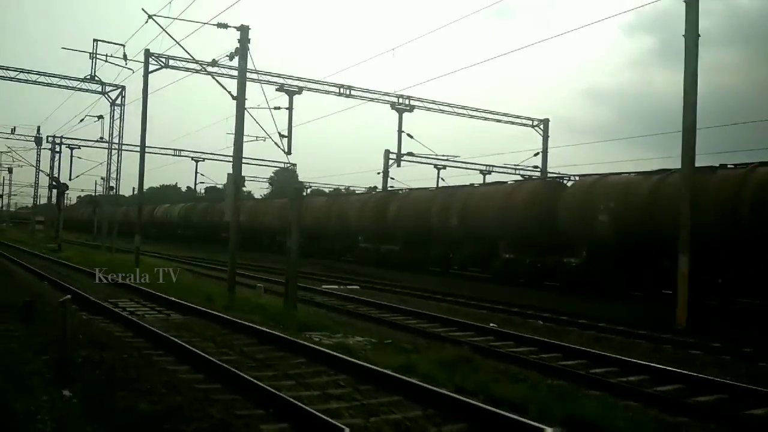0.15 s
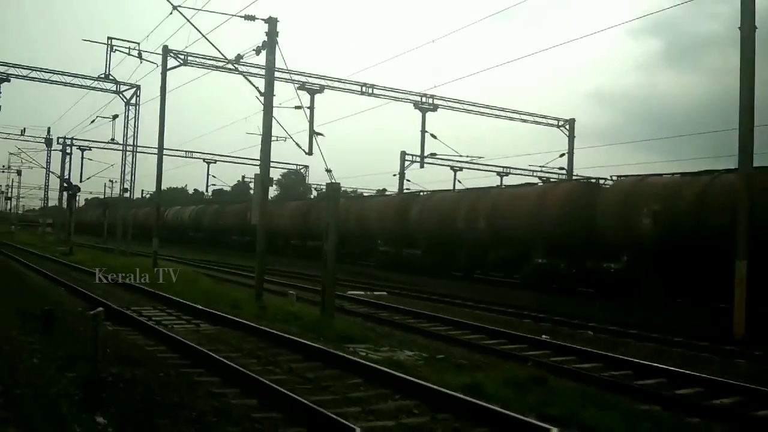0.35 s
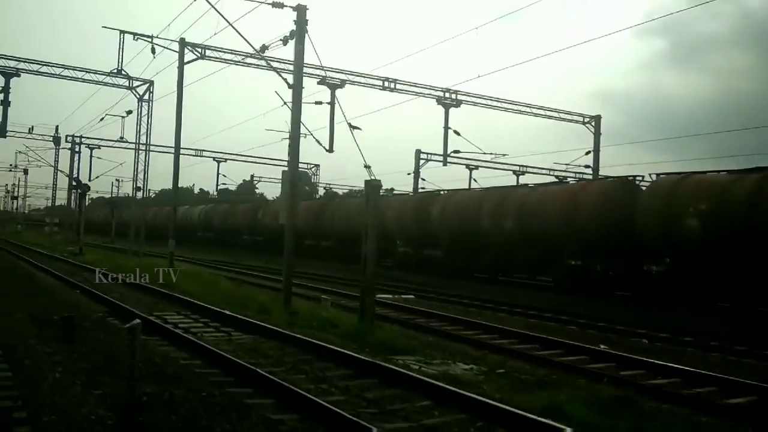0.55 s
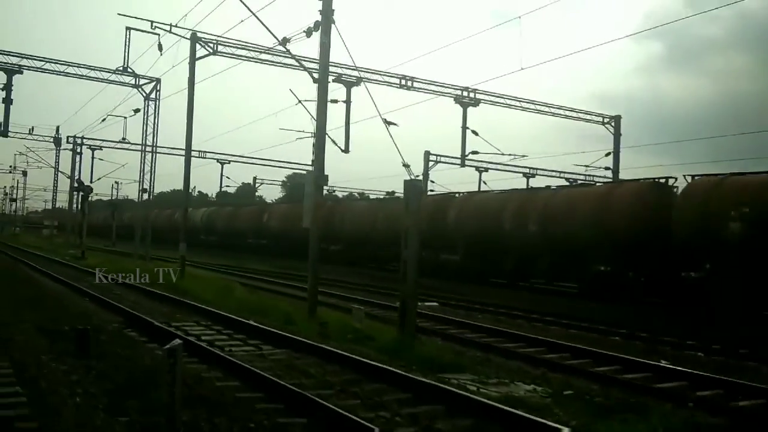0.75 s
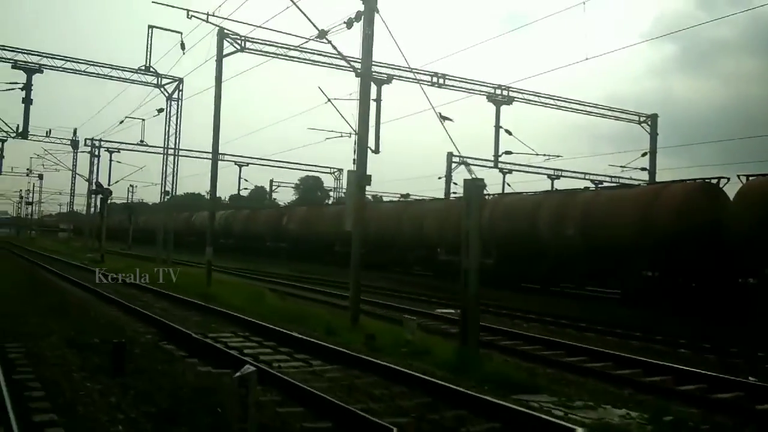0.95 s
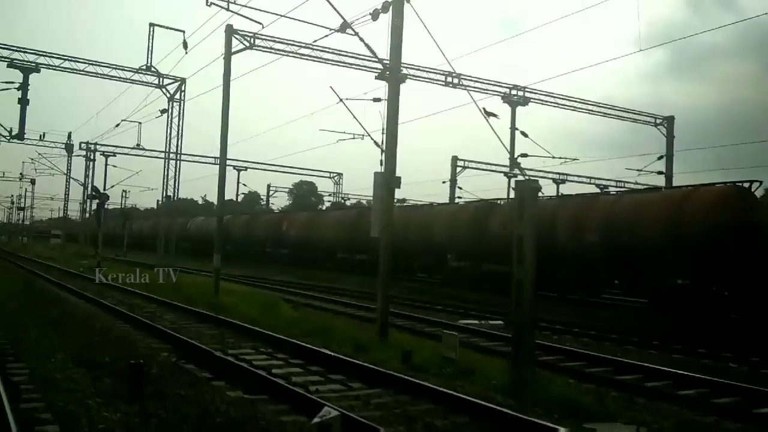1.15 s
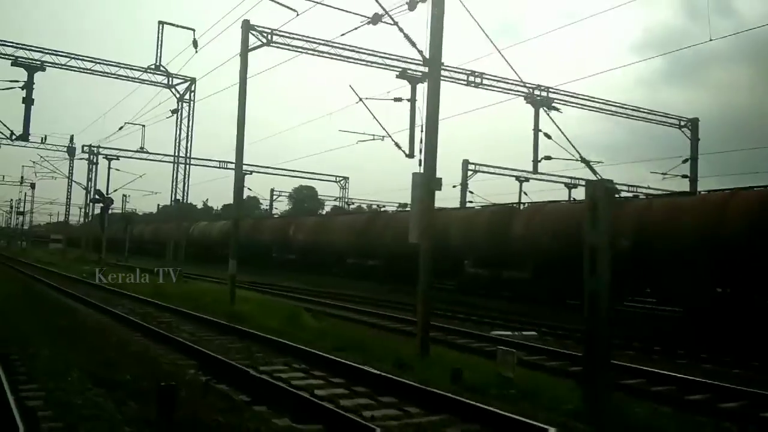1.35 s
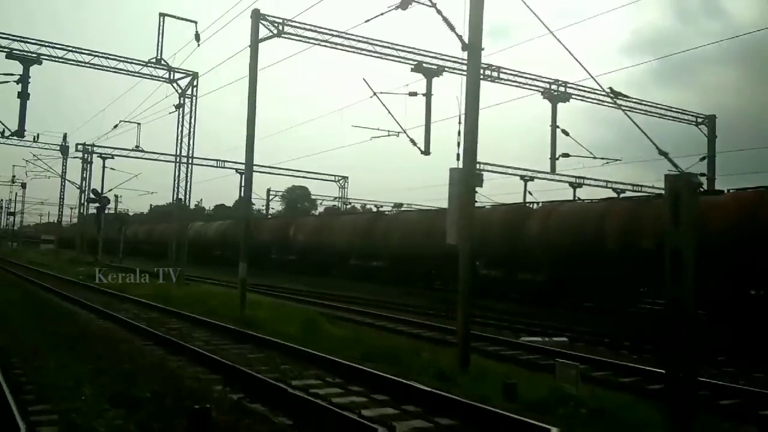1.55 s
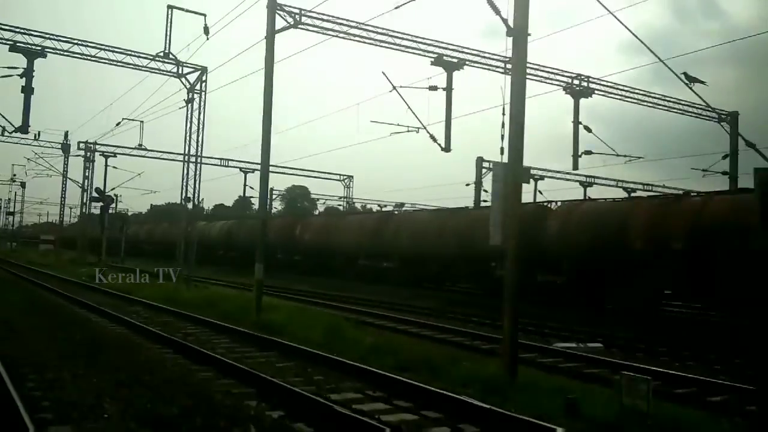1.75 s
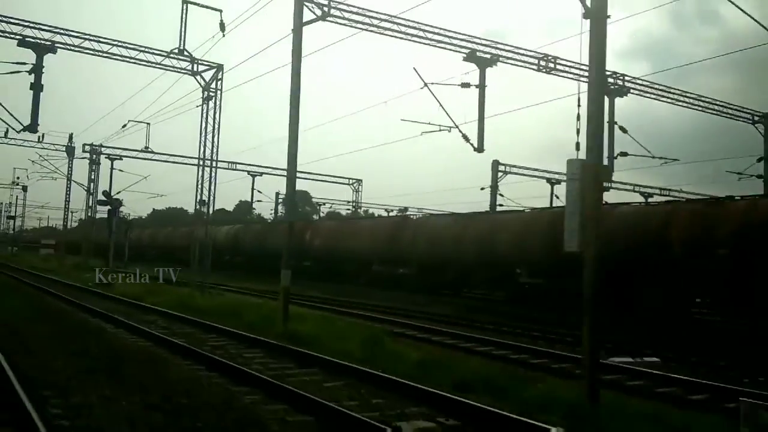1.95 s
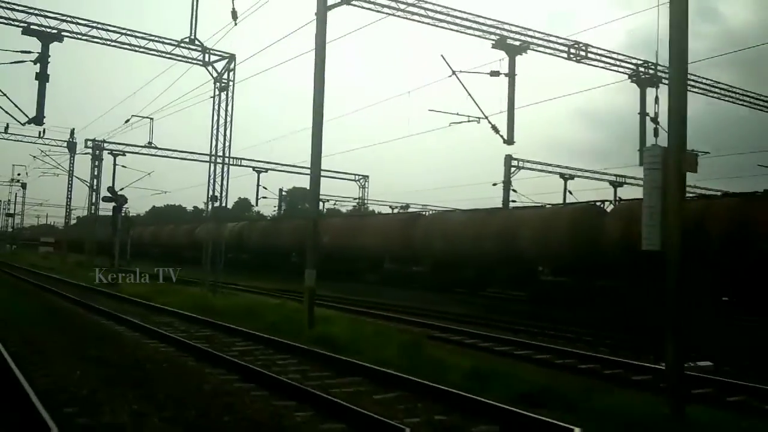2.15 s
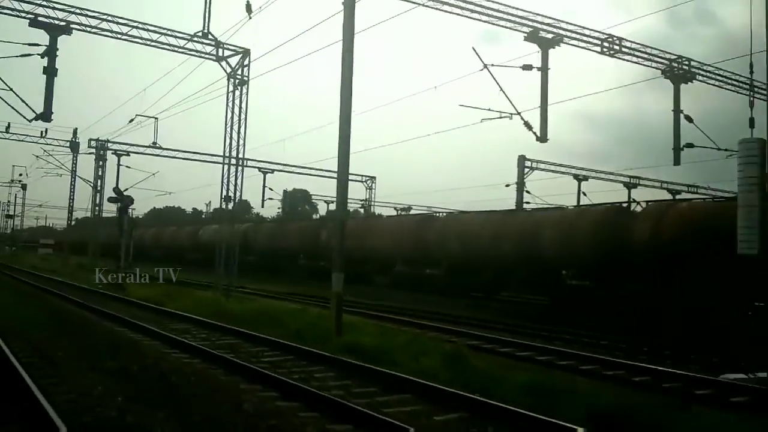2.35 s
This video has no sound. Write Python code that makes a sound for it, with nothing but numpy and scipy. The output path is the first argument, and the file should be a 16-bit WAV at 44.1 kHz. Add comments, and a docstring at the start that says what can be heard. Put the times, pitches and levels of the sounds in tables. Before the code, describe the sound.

Wind buffets the microphone at the open window of a slow train. Throbbing gusts start around 0.3 seconds, peak near 0.9 with sharp pops on the right, and ease by about 1.9. Wheels knock over rail joints with a rattle and low thud, clearest near 0.2, 0.6 and 1.8 seconds, then more lightly. A steady hiss and dull carriage rumble run throughout, with occasional faint wheel whistles.

```python
"""Wind buffets two microphone ports at the open window of a slow train. Eddies thump each port
on its own, in short throbbing gusts, with sharp pops on the right. The wheels knock over rail
joints: each rattles the carriage modes, and a low thud follows. The flanges whistle faintly
now and then, over a steady running hiss and the dull rumble of the carriage."""
import sys
import numpy as np
from scipy import signal
from scipy.fft import rfft, irfft
from scipy.io import wavfile
from scipy.ndimage import uniform_filter1d

SR = 44100
rng = np.random.default_rng(int(sys.argv[2]) if len(sys.argv) > 2 else 0)


def unload_audio(sound):
    """Save the sound as a 16-bit wav file, at the path given as the first command line argument."""
    columns = np.transpose(np.atleast_2d(sound))
    # keep every value between -1 and 1, then stretch to whole-number steps
    steps = np.round(np.clip(columns, -1, 1) * 32767)
    wavfile.write(sys.argv[1], SR, steps.astype(np.int16))


N = 105840
T = np.arange(N) / SR
BIN_HZ = np.fft.rfftfreq(N, 1 / SR)


def from_db(db):
    """Decibels to gain."""
    return 10 ** (np.asarray(db) / 20)


def rms_one(x):
    """Scale to rms 1."""
    return x / np.sqrt(np.mean(x ** 2) + 1e-20)


def butter(x, hz, kind, order):
    """Butterworth filter."""
    return signal.sosfilt(signal.butter(order, hz, kind, fs=SR, output="sos"), x)


def drift(rate_hz):
    """Slow random curve, rms about 1."""
    step, settle = 40, 2000
    pole = np.exp(-2 * np.pi * rate_hz * step / SR)
    noise = rng.standard_normal(N // step + settle + 2)
    slow = signal.lfilter([1], [1, -2 * pole, pole * pole], noise)[settle:]
    return np.interp(np.arange(N) / step, np.arange(len(slow)), rms_one(slow))


def grains(per_s, spread_db):
    """Random clicks of uneven size and sign."""
    size = from_db(spread_db * np.minimum(rng.exponential(1, N), 3)) * rng.choice([-1, 1], N)
    return size * (rng.random(N) < per_s / SR) + 1e-18


def resonate(x, hz, width_hz):
    """Two-pole resonance, peak gain 1."""
    r = np.exp(-np.pi * width_hz / SR)
    feedback = [1, -2 * r * np.cos(2 * np.pi * hz / SR), r * r]
    return signal.lfilter((1 - r * r) / 2 * np.array([1, 0, -1]), feedback, x)


def coloured(hz, db):
    """White noise shaped by a spectrum in dB."""
    gain = from_db(np.interp(np.log(np.maximum(BIN_HZ, 1)), np.log(hz), db))
    return irfft(rfft(rng.standard_normal(N)) * gain, N)


def evened(x, window_s=0.053, share=0.98):
    """Flatten most of the slow swing in level; rms 1."""
    local_rms = np.sqrt(uniform_filter1d(x * x, int(window_s * SR)).clip(0) + 1e-4 * np.mean(x * x))
    return rms_one(x / local_rms ** share)


def burst(start_s, rise_s, hold_s, tail_s):
    """Linear rise; exponential tail from hold_s after the start."""
    return np.clip((T - start_s) / rise_s, 0, 1) * np.exp(-np.maximum(T - start_s - hold_s, 0) / tail_s)


def carriage_rumble(level_db=-41, waver_db=2.0):
    """The rolling carriage rumbles, mostly alike at both ports."""
    # Each row: frequency in Hz, relative density in dB.
    spectrum = [(30, 6), (100, -3.5), (210, -6), (400, -29), (700, -19), (1200, -41), (2000, -71),
                (4000, -73)]
    mid, side = (coloured(*np.transpose(spectrum)) for _ in range(2))
    return from_db(level_db + waver_db * drift(7.6)) * rms_one(mid + 0.32 * side * [[1], [-1]])


def running_hiss(gain_db=2.0, waver_db=1.1):
    """Hiss of the running train, coloured per port; each band wavers on its own."""
    # Each row: frequency in Hz, left and right relative density in dB.
    spectrum = [(1020, -85, -84.5), (1340, -83.5, -81), (1840, -75.5, -78), (2630, -74, -75),
                (3050, -70.5, -77.5), (3580, -65.5, -74.5), (4260, -77, -70.5), (4800, -70.5, -84),
                (5190, -75, -69), (6150, -73, -75), (6700, -75.5, -70.5), (7630, -70, -70.5),
                (8720, -75, -74.5), (9930, -73.5, -73), (11560, -79, -66.5), (12170, -74.5, -75),
                (14500, -86.5, -79.5), (16500, -82, -74.5)]
    # Each row: time in s, treble and lowest-band relative level in dB.
    levels = [(0.0, -34, -40), (0.29, -34.5, -40.5), (0.39, -33, -37.5), (0.65, -34, -38.5),
              (0.85, -34, -37.5), (1.022, -35, -41.5), (1.48, -35.5, -44), (1.83, -35.5, -41),
              (2.04, -34.5, -37.5), (2.4, -34.5, -38)]
    # Band edges in Hz.
    edges_hz = [900, *np.geomspace(2800, 16500, 14)]
    hz, left_db, right_db = np.transpose(spectrum)
    time_s, treble_db, low_db = np.transpose(levels)
    bins = rfft(rms_one(np.array([coloured(hz, left_db), coloured(hz, right_db)])))
    band, out = np.digitize(BIN_HZ, edges_hz), 0
    for k in range(1, len(edges_hz)):
        level_db = treble_db if k > 1 else low_db - low_db.mean() + treble_db.mean()
        swing_db = waver_db * np.array([drift(4.3), drift(8.6)])
        out += from_db(np.interp(T, time_s, level_db) + gain_db + swing_db) * irfft(bins * (band == k), N)
    return out


def flange_whistles(fade_share=0.35, waver_db=2.0):
    """Wheel flanges whistle: narrow noise bands that swell and waver, unrelated at the two ports."""
    # Each row: start and end in s, pitch and width in Hz, left and right level in dB.
    whistles = [(-.1, .45, 6180, 330, -42, -38), (0.517, 0.8, 5680, 220, -58, -48),
                (.52, .82, 13200, 600, -50, -45), (1.55, 2.07, 13200, 450, -50, -46),
                (0.45, 1.6, 3500, 750, -41.5, -70), (1.952, 2.39, 3300, 250, -44, -52),
                (1.979, 2.2, 6080, 350, -46, -43)]
    out, noise = 0, rng.standard_normal((2, N))
    for start_s, end_s, hz, width_hz, *port_db in whistles:
        fade_s = fade_share * (end_s - start_s)
        swell = np.clip(np.minimum(T - start_s, end_s - T) / fade_s + 0.5, 0, 1)
        tone = rms_one(resonate(resonate(noise, hz, width_hz), hz, width_hz))
        out += from_db(port_db)[:, None] * swell * from_db(waver_db * drift(40)) * tone
    return out


def carriage_ring(drive_at, modes):
    """An uneven rattle rings each mode under the envelope drive_at(hz)."""
    out = 0
    for hz, db, t60_s in modes:
        width_hz = np.log(1000) / np.pi / t60_s
        rattle = drive_at(hz) * rms_one(grains(per_s=900, spread_db=1.5))
        out += from_db(db) * resonate(rattle, hz, width_hz) * np.sqrt(SR / width_hz / 4)
    return out


def joint_impacts(rattle_rise_s=0.0095, thud_width_hz=82, reach_octaves=0.65, pivot_hz=1000):
    """Each joint rattles the carriage modes, then thuds. Returns clank, knock with thud."""
    # Each row: start and rattle length in s, clank drive in dB, its tilt in dB/octave, knock drive
    # in dB, its centre in Hz, thud delay in s, thud gain in dB, thud pitch in Hz.
    joints = [(.0, 0.025, -33, -10, -26, 317, 0.014, -28.5, 172.3),
              (0.204, 0.057, -47, 6.5, -15.5, 455, 0.026, -22.5, 128.4),
              (0.639, 0.046, -31, -3.5, -13.5, 430, 0.0079, -12, 146.9),
              (1.82, 0.015, -28.5, -10, -15, 430, 0.025, -24.5, 175),
              (1.906, 0.0047, -47, -5, -67, 265, 0.002, -28.5, 251.4),
              (2.108, 0.046, -48.5, -32, -23, 600, 0.0082, -27.5, 208),
              (2.303, 0.027, -34, -15, -32.5, 420, 0.023, -27.5, 170.1)]
    # Low carriage modes. Each row: frequency in Hz, gain in dB, T60 in s.
    knock_modes = [(265, -5, 0.079), (397, -21.5, 0.12), (430, -10, 0.04), (551, -15, 0.069),
                   (730, -27.5, 0.057)]
    # High carriage modes, same columns.
    clank_modes = [(864, -14.5, 0.068), (960, -14, 0.067), (1105, -17.5, 0.027), (1340, -13, 0.02),
                   (1790, -10, 0.015), (2275, -14.5, 0.079), (3450, -9, 0.0049)]
    clanks, knocks, thud = [], [], 0
    noise = rng.standard_normal(N)
    for start_s, length_s, clank_db, tilt_db, knock_db, centre_hz, delay_s, thud_db, thud_hz in joints:
        shake = burst(start_s, rattle_rise_s, length_s, tail_s=0.0043)
        shake += from_db(-1.5) * burst(start_s, rattle_rise_s, length_s, tail_s=0.042)
        clanks.append((from_db(clank_db) * shake, tilt_db))
        knocks.append((from_db(knock_db) * shake, centre_hz))
        rough = rms_one(resonate(resonate(noise, thud_hz, thud_width_hz), thud_hz, 2 * thud_width_hz))
        tone = np.sqrt(2) * np.sin(2 * np.pi * thud_hz * T + rng.uniform(0, 2 * np.pi))
        envelope = burst(start_s + delay_s, rise_s=0.0037, hold_s=length_s / 2, tail_s=0.02)
        thud += from_db(thud_db) * (tone + from_db(1) * rough) * envelope

    def knock_drive(hz):
        return sum(drive / (1 + (np.log2(hz / centre) / reach_octaves) ** 2) for drive, centre in knocks)

    def clank_drive(hz):
        return sum(drive * from_db(tilt * np.log2(hz / pivot_hz)) for drive, tilt in clanks)

    knock = carriage_ring(knock_drive, knock_modes)
    clank = carriage_ring(clank_drive, clank_modes)
    return np.array([butter(clank, 4100, "low", order=6), knock + thud])


def wheel_knocks(clank_side_db=-1, knock_side_db=-35.5, clank_left_db=3, left_lag_s=0.00022):
    """Rail joints at both ports: a wide clank, and a near-mono knock that reaches the left later."""
    clank, knock = joint_impacts()
    side = from_db([clank_side_db, knock_side_db]) @ joint_impacts()
    late_knock = np.interp(T - left_lag_s, T, knock)
    return np.array([from_db(clank_left_db) * clank + late_knock + side, clank + knock - side])


def port_pops(push_s=0.0014, pull_s=0.0027):
    """Sharp pops: a quick push and a slower pull back of equal area."""
    # Each row: time in s, push level in dB.
    pops = [(0.327, -3.5), (0.341, -8), (0.909, 3.5), (0.934, -12), (0.956, -4), (1.271, -12.5),
            (1.409, -1), (1.422, -5.5), (1.507, -19.5), (1.752, -4)]
    out = 0
    for time_s, db in pops:
        push = np.exp(-(2 * (T - time_s) / push_s) ** 2)
        pull = push_s / pull_s / 2 * np.exp(-((T - time_s - pull_s) / pull_s) ** 2)
        out += from_db(db) * (push - pull)
    return out


def wind_on_port(breeze_db, gusts, throb_width_share=0.61, breeze_flutter_db=-33):
    """Eddies thump the port: each gust throbs around its own pitch, with a flutter above it."""
    # Fast air carries the flutter higher. Each row: time in s, top band in dB re the flutter band.
    top_levels = [(.25, -10), (.46, -18), (.52, -39), (.75, -22), (.95, -10), (1.02, -65), (1.7, -41)]
    eddies = grains(per_s=1300, spread_db=3)
    rumble = evened(butter(butter(eddies, 53, "high", order=2), 207, "low", order=4))
    tilted = butter(eddies, 346, "low", order=2)
    flutter = evened(butter(butter(tilted, 242, "high", order=1), 576, "low", order=8))
    top = evened(butter(butter(eddies, 576, "high", order=4), 806, "low", order=8))
    flutter += from_db(np.interp(T, *np.transpose(top_levels))) * top
    low = from_db(breeze_db) * rumble
    flutter_power = from_db(breeze_db + breeze_flutter_db) ** 2
    for middle_s, length_s, hz, throb_db, flutter_db in gusts:
        swell = np.exp(-(2.12 * np.abs(T - middle_s) / length_s) ** 2.5)
        low += from_db(throb_db) * swell * rms_one(resonate(rumble, hz, throb_width_share * hz))
        flutter_power += (swell * from_db(flutter_db)) ** 2
    return low + np.sqrt(flutter_power) * flutter


def wind():
    """Wind buffets each port on its own; the right one also pops."""
    # Wind between gusts. Each row: time in s, left and right level in dB.
    breeze = [(0, -41, -47), (.1, -68, -63), (.2, -65, -73), (0.298, -38, -19.5), (.5, -32.5, -48.5),
              (.7, -35, -19.5), (.95, -23, -32.5), (1.12, -50, -27.5), (1.3, -46, -35.5),
              (1.45, -48, -19.5), (1.55, -50, -34), (1.7, -53, -32.5), (1.85, -28, -35.5),
              (2.0, -50, -41.5), (2.4, -71.5, -74)]
    # Each row: middle and length in s, throb pitch in Hz, throb and flutter level in dB.
    left_gusts = [(0.371, 0.036, 94, -27.5, -29.5), (0.435, 0.056, 139, -24.5, -43),
                  (0.48, 0.093, 144, -24, -56), (0.563, 0.1, 77.6, -19, -49), (0.689, 0.091, 91, -14, -28),
                  (0.781, 0.032, 140, -27, -16.5), (0.834, 0.042, 101, -17, -23.5),
                  (0.888, 0.085, 89, -19, -23.5), (0.947, 0.053, 103, -12, -35.5),
                  (1.032, 0.07, 75, -15, -47), (1.096, 0.051, 91, -14.5, -63), (1.157, 0.04, 115, -21, -67),
                  (1.231, 0.039, 94, -18.5, -58), (1.3, 0.081, 78, -29, -79), (1.597, 0.05, 171, -26, -56),
                  (1.687, 0.082, 110, -28, -62)]
    right_gusts = [(0.324, 0.031, 150, -39, -16.5), (0.429, 0.11, 153, -28, -32),
                   (0.512, 0.028, 158, -21, -27.5), (0.581, 0.083, 96, -20, -25),
                   (0.715, 0.025, 136, -34, -33), (0.832, 0.058, 157, -29, -17),
                   (0.872, 0.018, 135, -8.5, -10), (0.93, 0.043, 150, -15.5, -26),
                   (1.016, 0.078, 106, -15.5, -30), (1.104, 0.022, 174, -14, -23),
                   (1.164, 0.052, 150, -19.5, -20.5), (1.228, 0.067, 170, -24, -17.5),
                   (1.283, 0.087, 243, -16, -25), (1.362, 0.049, 91, -10, -21.5),
                   (1.42, 0.05, 191, -22, -18.5), (1.507, 0.072, 83, -21, -36),
                   (1.607, 0.067, 139, -26.5, -41), (1.664, 0.015, 154, -21.5, -39),
                   (1.763, 0.06, 188, -26, -29.5)]
    time_s, left_db, right_db = np.transpose(breeze)
    left = wind_on_port(np.interp(T, time_s, left_db), left_gusts)
    right = wind_on_port(np.interp(T, time_s, right_db), right_gusts)
    return np.array([left, right + port_pops()])


def scene():
    """Stereo sum of wind and train."""
    return wind() + wheel_knocks() + flange_whistles() + running_hiss() + carriage_rumble()


def record(dry, ceiling=1.15, stop_hz=15920):
    """Soft clip, then a steep low-pass."""
    rounded = ceiling * np.tanh(dry / ceiling)
    return signal.sosfilt(signal.cheby2(20, 70, stop_hz, fs=SR, output="sos"), rounded)


dry = scene()
out = record(dry)
unload_audio(out)
```